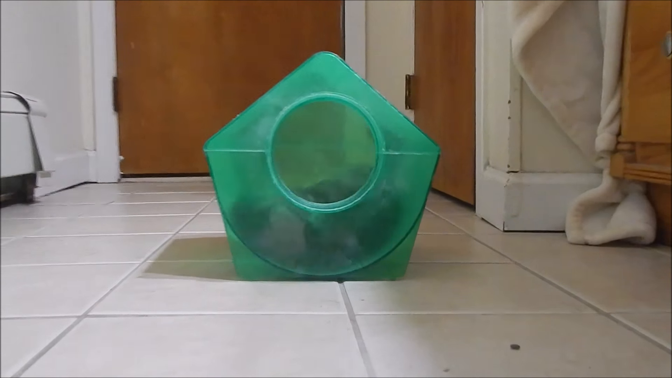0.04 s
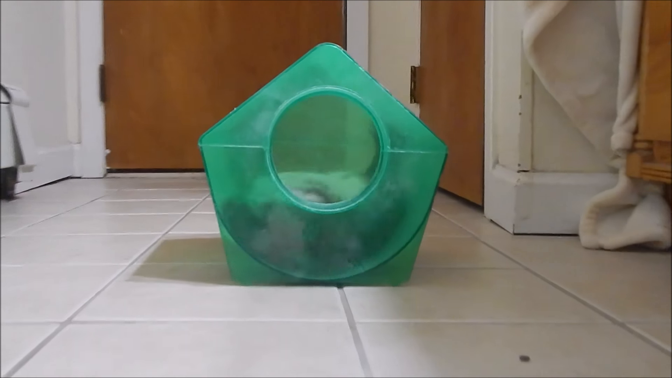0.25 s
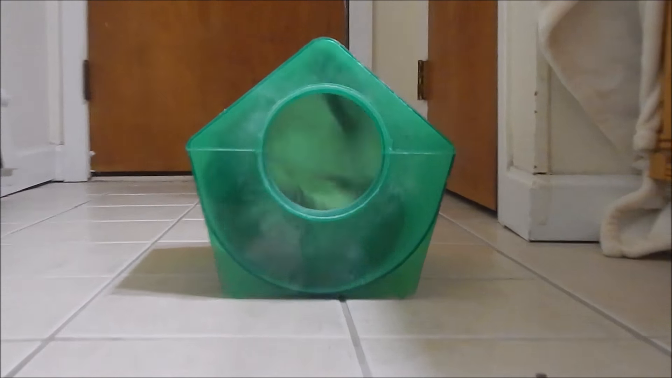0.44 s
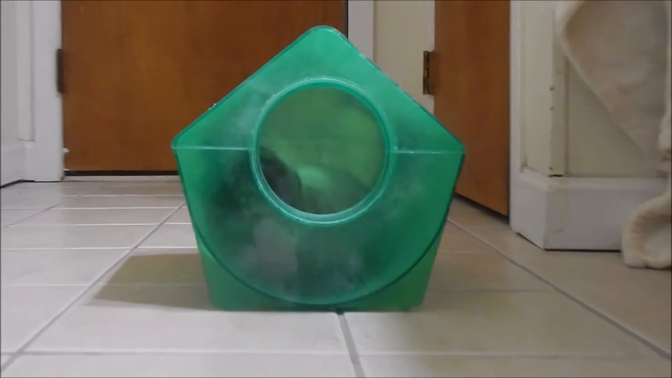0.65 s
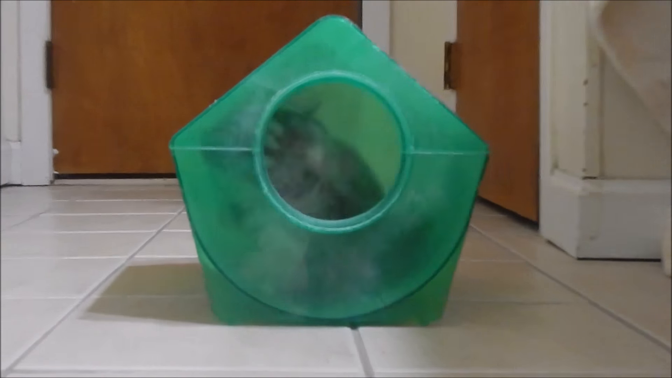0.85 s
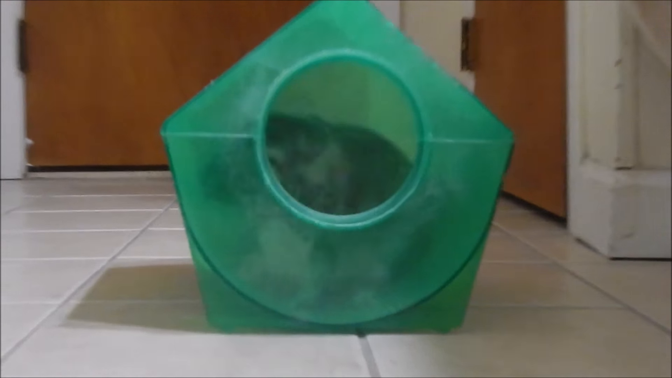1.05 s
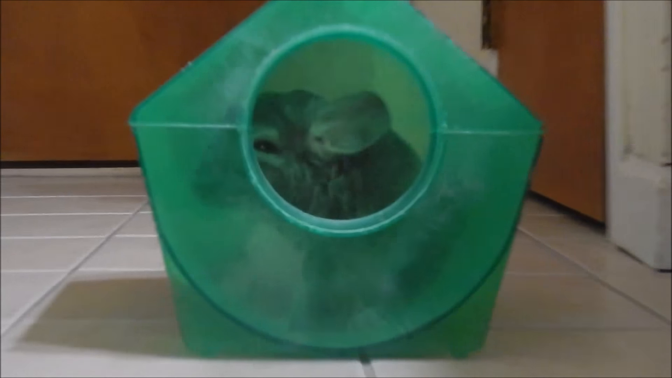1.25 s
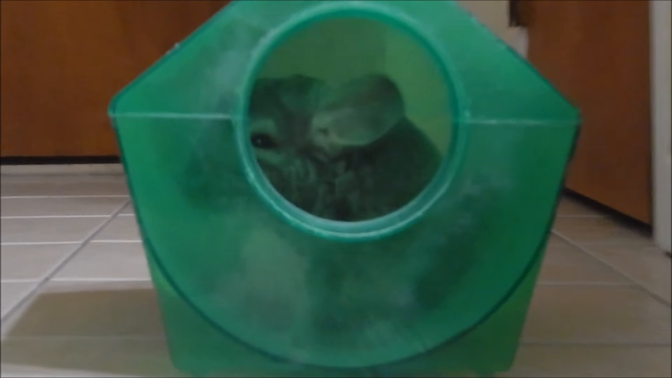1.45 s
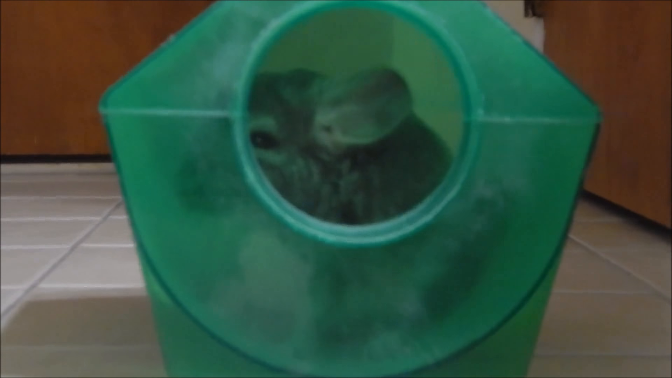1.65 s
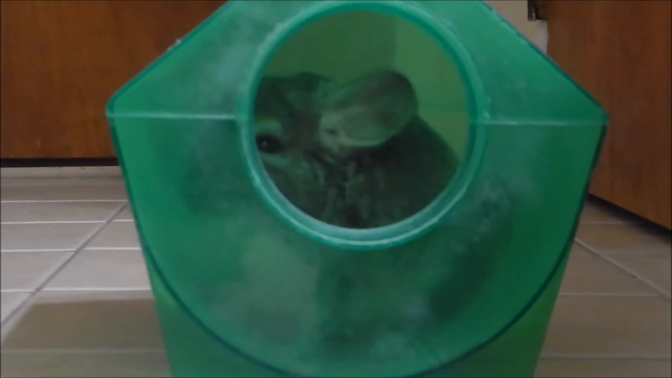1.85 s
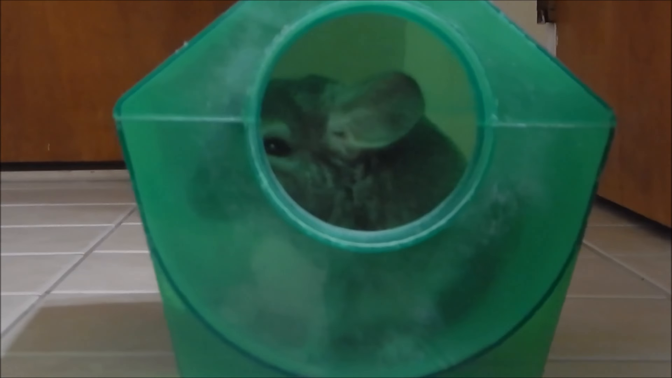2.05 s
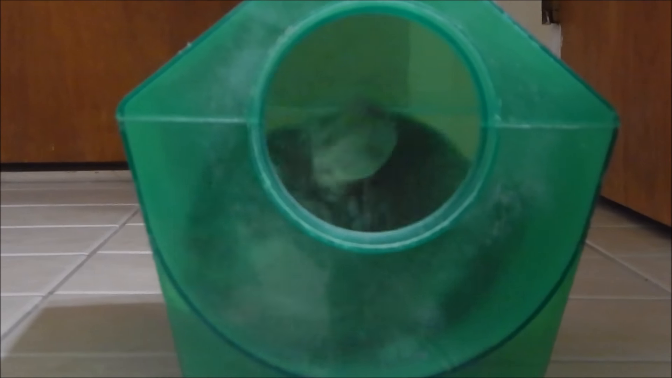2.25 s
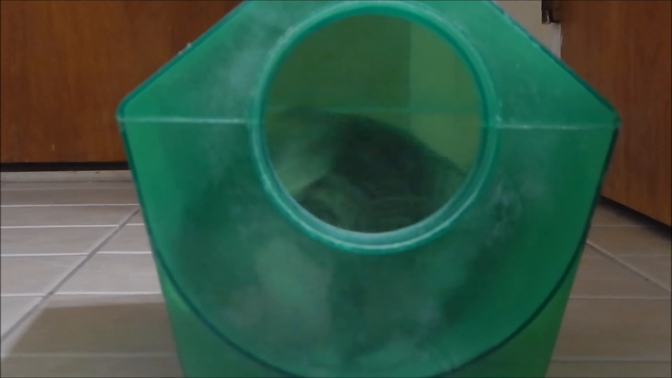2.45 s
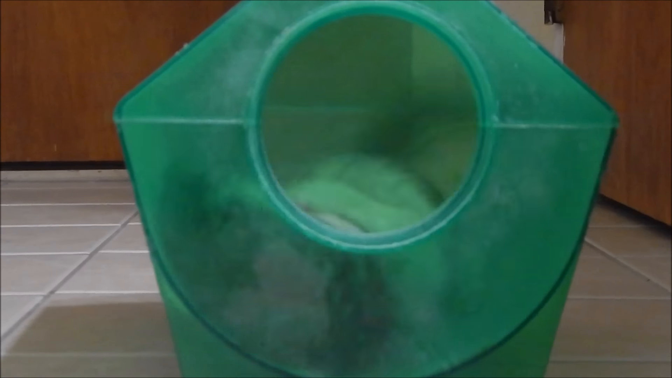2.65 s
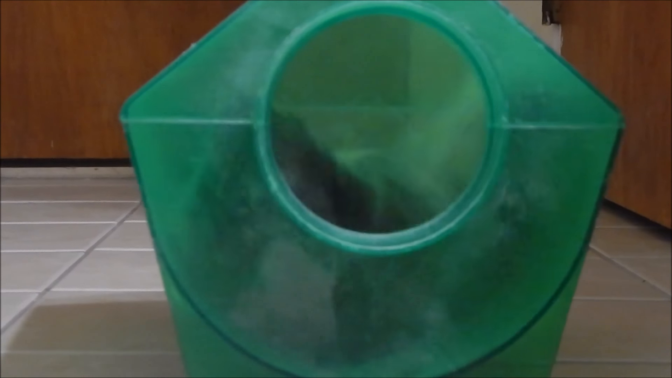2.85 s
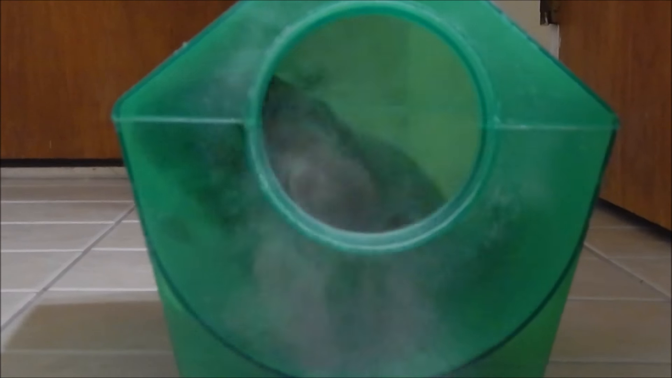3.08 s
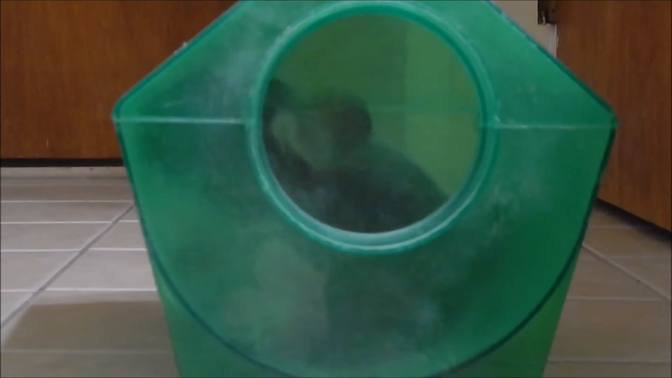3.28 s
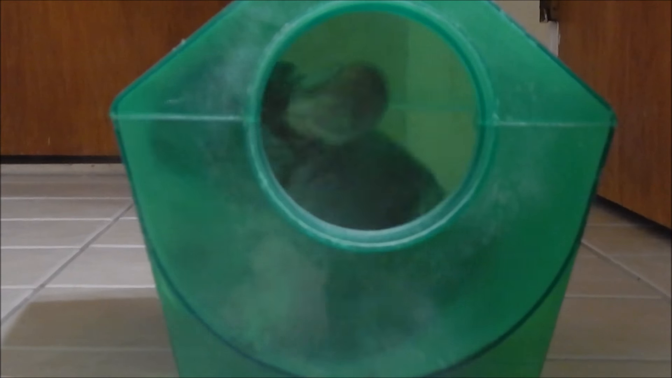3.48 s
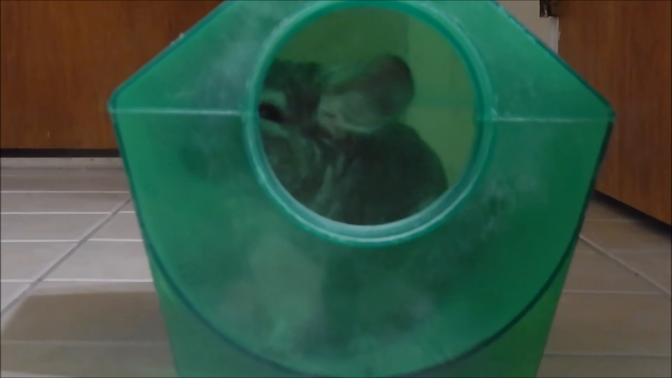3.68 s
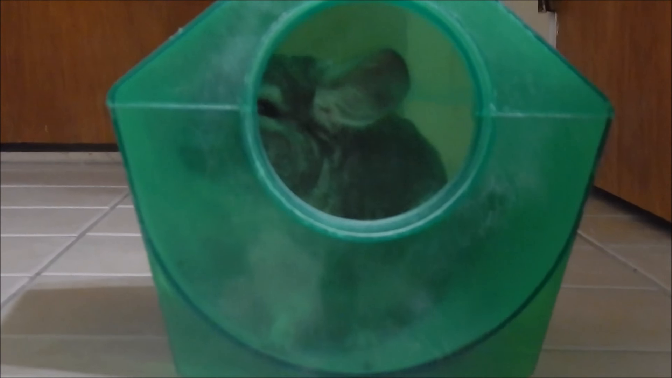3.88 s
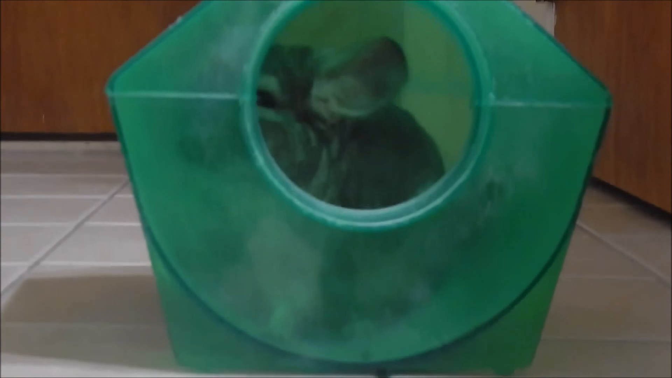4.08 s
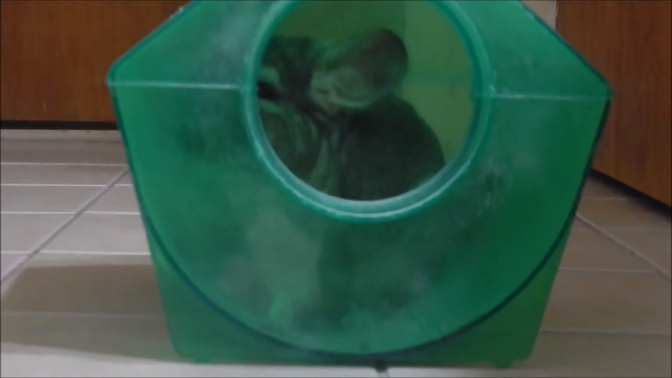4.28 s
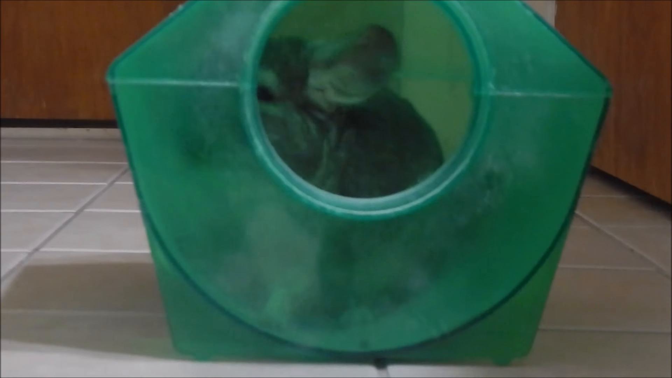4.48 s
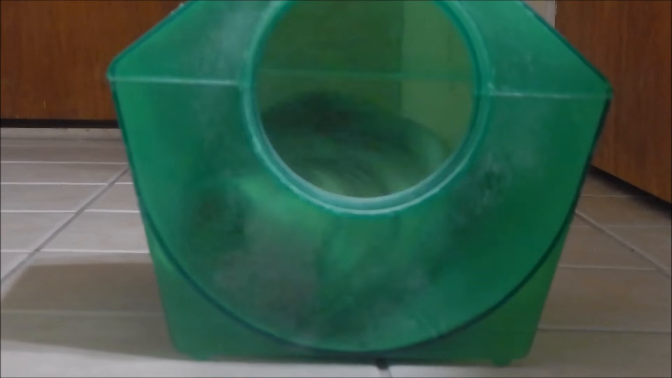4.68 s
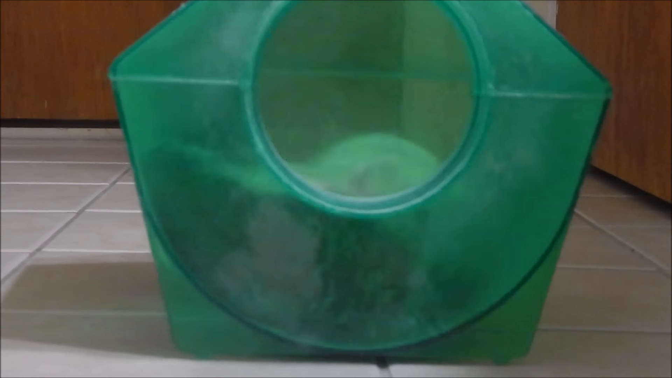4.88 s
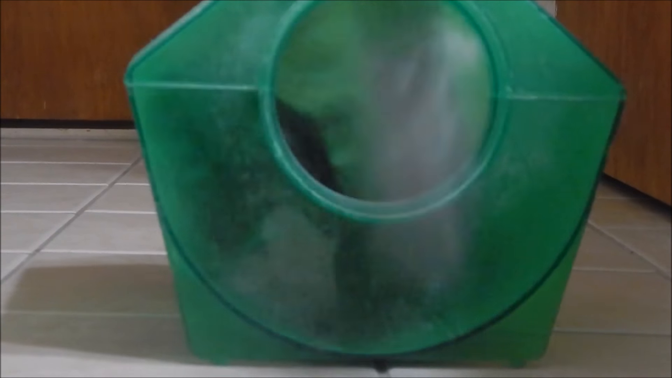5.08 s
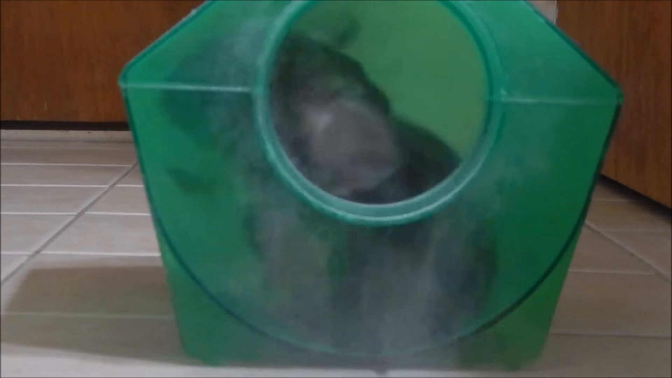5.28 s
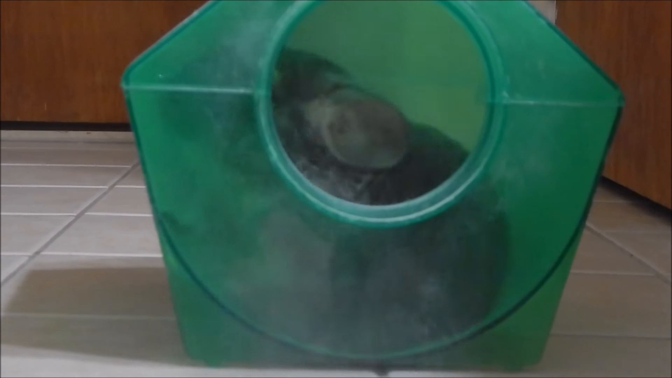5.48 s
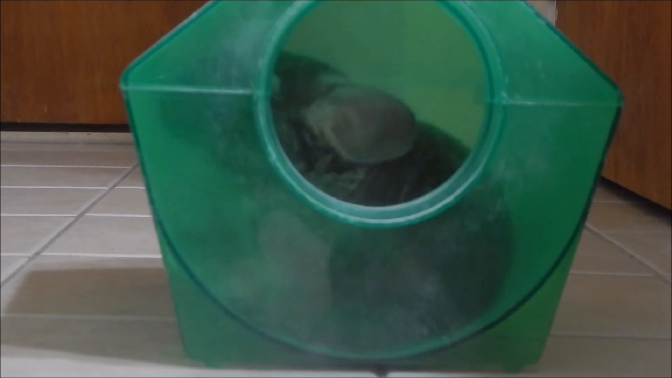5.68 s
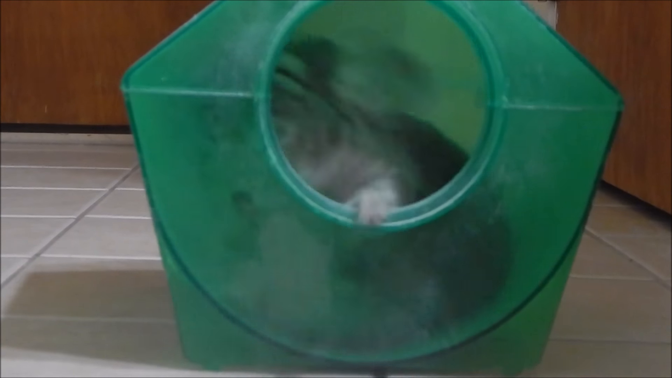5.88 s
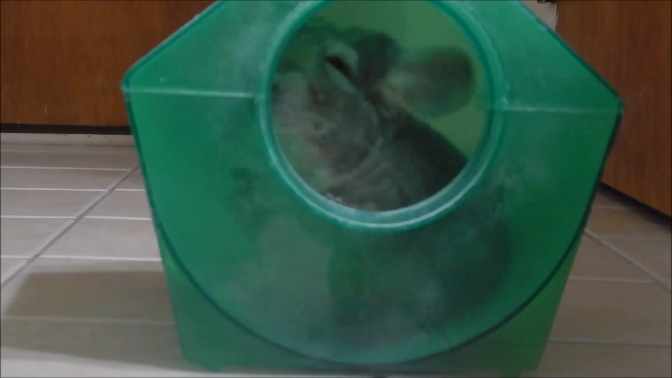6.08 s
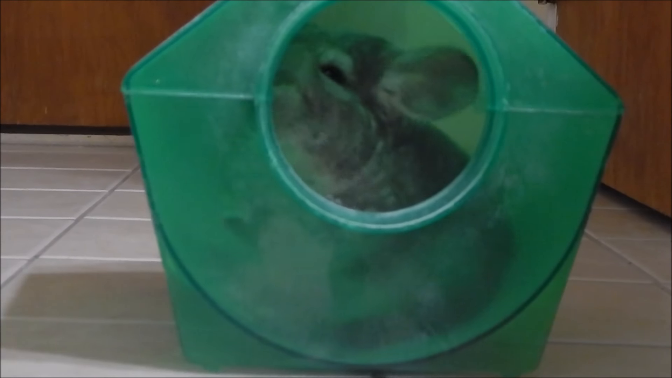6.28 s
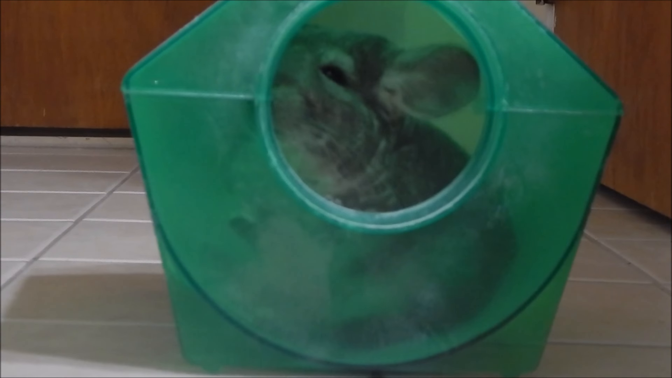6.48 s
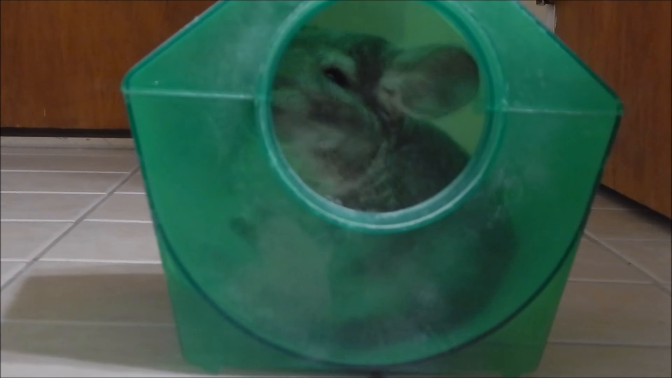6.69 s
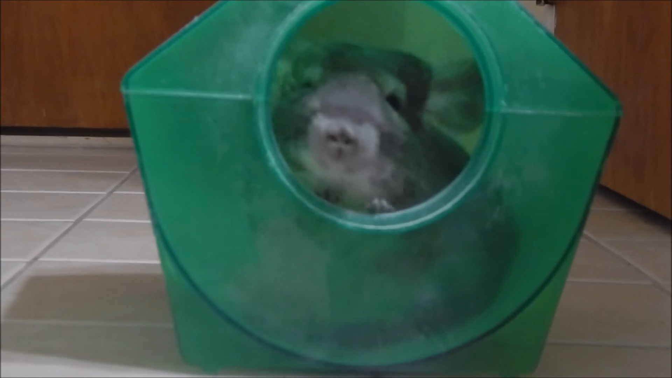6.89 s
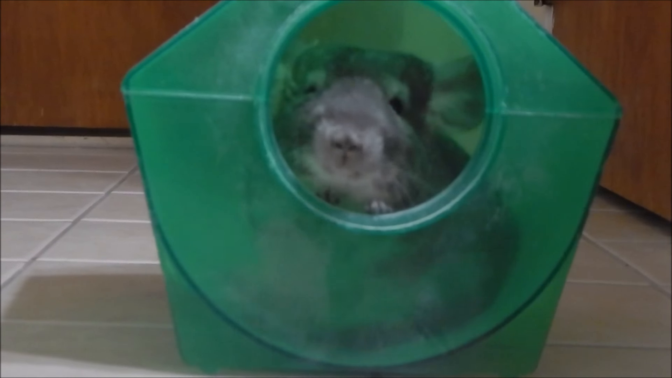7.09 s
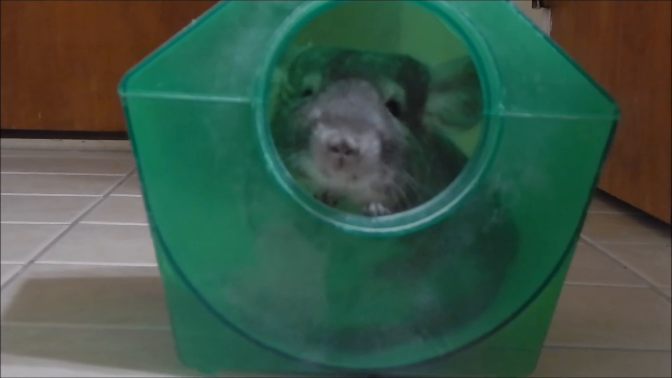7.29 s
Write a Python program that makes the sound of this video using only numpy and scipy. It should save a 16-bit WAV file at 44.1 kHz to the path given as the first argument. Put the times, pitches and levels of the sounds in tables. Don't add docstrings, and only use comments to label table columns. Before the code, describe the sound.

A small furry animal dust-bathes in a hollow plastic house, heard close up in a tiled room with short reverberation. A steady low hum around 120 Hz and faint fan air run throughout. From 0 to about 1.3 s, quick boxy thumps, claw raps, scratchy scraping and fizzing dust tumble together, over a thin high zoom-motor whine. A light click falls at 0.9 s; a hard, bright click at 1.5 s stops the whine, and the sound briefly dips. Hum dominates until 2.3 s, when scratching leads into a second, heavier flurry, 2.45 to 3.2 s. Light scuffs and a faint click follow around 3.6 s, then quiet, with a barely audible airy tone near 4.4 s. A third burst of knocks and dust spray runs 4.7 to 5.4 s. Softer scrapes, ticks and small knocks come at 5.6 to 6.5 s, and a last brief scuff near 6.9 s before hum alone.

```python
import sys
import numpy as np
from scipy import signal
from scipy.io import wavfile
from scipy.ndimage import uniform_filter1d

SR = 44100
rng = np.random.default_rng(int(sys.argv[2]) if len(sys.argv) > 2 else 0)


def dump_mix(stems):
    frames = np.atleast_2d(stems).T
    limited = np.clip(frames, -1, 1)
    pcm = np.round(limited * 32767).astype(np.int16)
    wavfile.write(sys.argv[1], SR, pcm)


def how_loud(loudness_db):
    steps = np.asarray(loudness_db, float) / 20
    return 10 ** steps


N = 323550


def evened(x):
    return x / np.sqrt(np.mean(x ** 2) + 1e-20)


def read(points, hz):
    f, value = np.transpose(points)
    return np.interp(np.log(hz + 1), np.log(f + 1), value, -150, -150)


def add(mix, start_s, sound):
    part = mix[..., round(start_s * SR):][..., :sound.shape[-1]]
    part += sound[..., :part.shape[-1]]


def ring(x, hz, t60):
    r, w = 10 ** (-3 / (t60 * SR)), 2 * np.pi * hz / SR
    return signal.lfilter([0, np.sin(w)], [1, -2 * r * np.cos(w), r * r], x)


def wander(per_s):
    drive = uniform_filter1d(rng.standard_normal(N), 64)
    return evened(signal.lfilter([1], [1, -np.exp(-2 * np.pi * per_s / SR)], drive))


# pitch_hz, left_right_likeness (0 to 1)
COHERENCE = [(60, 1), (150, 0.99), (380, 0.9), (950, 0.85), (2380, 0.19), (5980, 0.039), (15000, 0.3)]


def noise(spectrum, size, patchy_db):
    frames, hz = 4 * N // size + 5, np.fft.rfftfreq(size, 1 / SR)
    a, b, c, d, patches = rng.standard_normal((frames, len(hz), 5)).T
    patches = uniform_filter1d(patches, size // 64, 0)
    patches = evened(uniform_filter1d(patches, 8192 // size, 1))
    same = np.clip(np.interp(hz, *np.transpose(COHERENCE)), -1, 1)[:, None]
    left = a + 1j * b
    right = same * left + np.sqrt(1 - same ** 2) * (c + 1j * d)
    z = np.array([left, right])
    z *= how_loud(read(spectrum, hz)[:, None] + patchy_db * patches)
    return evened(signal.istft(z, nperseg=size, noverlap=3 * size // 4)[1][:, :N])


def swells(start_s, level_db, rise_s, fall_s):
    late = np.arange(0, N, 64)[:, None] / SR - start_s
    before = -late / np.maximum(rise_s, .004)
    after = late / np.maximum(fall_s, .004)
    shape_db = level_db - 10 * np.where(late < 0, before, after)
    return np.interp(np.arange(N), np.arange(0, N, 64), np.sqrt((how_loud(shape_db) ** 2).sum(1)))


def swelling_tones(events, rise_s, t60, trim_db=0):
    out, t = np.zeros(N), np.arange(6000) / SR
    for start_s, level_db, hz in events:
        rise = rise_s(hz) if callable(rise_s) else rise_s
        swell = np.sin(np.pi / 2 * np.minimum(t / rise, 1)) ** 2
        decay = how_loud(level_db + trim_db - 60 * np.maximum(t - rise, 0) / t60)
        add(out, start_s, swell * decay * np.sin(2 * np.pi * hz * t))
    return out


def rattles(events, t60):
    out, t = np.zeros(N), np.arange(3000) / SR
    for start_s, level_db, hz in events:
        tick = ring(rng.standard_normal(3000) * how_loud(-60 * t / t60), hz, 0.013)
        add(out, start_s - .001, how_loud(level_db - 13.5) * tick / abs(tick).max())
    return out


# pitch_hz, level_db, t60_s
SHELL = [(88.5, -25, 0.085), (152, 3, 0.42), (228.1, -1, 0.21), (274, -6, 0.25), (296, -9.5, 0.25),
         (390, -18.5, 0.16), (480, -28, 0.051), (530, -42, 0.1)]
# pitch_hz, level_db, t60_s
WALL = [(414, -2.5, 0.047), (514, 0, 0.099), (698, 1.5, 0.047), (767, 1.5, 0.022), (840, -2.5, 0.026),
        (930, -4, 0.042), (1025, -2.5, 0.06), (1320, -27.5, 0.025), (1890, -36, 0.026), (3400, -21, 0.014)]
# start_s, level_db, ease_10db_s
PUSHES = [(0.0, -12, 0.14), (0.238, -11.5, 0.08), (.42, -13, 0.26), (.72, -11.5, 0.1), (1.02, -23, -0.12),
          (1.107, -12, 0.0542), (1.29, -14.5, -0.12), (2.47, -15.5, 0.1552), (2.63, -11, 0.01),
          (2.75, -11, 0.15), (2.879, -8.5, 0.003), (2.97, -15.5, 0), (3.088, -9.5, 0.1071),
          (4.76, -12, -0.05), (4.911, -9.5, 0.216), (5.02, -16, 0.16), (5.28, -11, 0.0443),
          (5.97, -31, 0.5), (6.29, -20.5, 0.16), (6.5, -26, -0.66), (6.89, -27.5, 0.23)]
PUSH_RISE_S = 0.04


def rubbing():
    drive = rng.standard_normal(N) * how_loud(1.7 * wander(8.6))
    body = evened(sum(how_loud(db) * evened(ring(drive, hz, t60)) for hz, db, t60 in SHELL))
    wall = evened(sum(how_loud(db) * evened(ring(drive, hz, t60)) for hz, db, t60 in WALL))
    start_s, level_db, ease_s = np.transpose(PUSHES)
    return swells(start_s, level_db, PUSH_RISE_S, ease_s) * (how_loud(-7.0) * body + how_loud(-30.0) * wall)


# pitch_hz, density_db per Hz
SCRAPE = [(500, 5.5), (900, 5), (1500, 3), (2200, -1.5), (3200, -12.5), (5000, -31)]
# pitch_hz, density_db per Hz
DUST = [(1470, -21), (2200, -1.5), (3850, -2), (5100, -5.5), (5750, -4.5), (9490, -5), (13300, -12.5),
        (14400, -17.5), (15300, -40.5)]
# start_s, spray_db, claws_above_spray_db, rise_10db_s, fall_10db_s
KICKS = [(0.0, -57, 8, .05, .02), (.04, -56, 20, -1, -0.1), (.132, -59.5, 9, .015, 0.05),
         (.213, -59, 16, -0.05, 0.05), (.31, -62.5, -4, 1.2, 0.3), (0.404, -47, 12, -0.06, -0.02),
         (.432, -55, 9, 0.1, 0.05), (.51, -52, 6.5, 0.04, 0.05), (0.565, -49.5, 9.5, -0.01, 0),
         (.62, -57.5, 10, 0.2, 0.15), (.67, -50.5, 11, .015, 0.02), (.72, -54.5, 13, 0.08, 0.06),
         (.81, -53.5, 0, .06, 0.04), (.89, -53, 7.5, 0.12, 0.08), (.972, -52.5, 4, 0.07, 0.06),
         (1.018, -58, 19, 0.1, 0.18), (1.04, -55.5, 11, 0.1, 0.16), (1.45, -69.5, -5, 9, 2),
         (1.57, -57.5, 8.5, 0.1, 0.1),
         (2.299, -55.5, 12.5, .012, 0.055), (2.449, -52, 8, 0.065, 0.06),
                (2.498, -46, 10, 0.019, 0.045), (2.55, -47.5, 8.1, 0.035, 0.042),
                (2.645, -56, 17, 0.029, 0.043), (2.82, -46.5, 6, 0.14, 0.06),
                (2.998, -55.5, 17.5, 0.13, 0.014), (3.093, -52.5, 8, 0.055, 0.12),
                (3.44, -59, 11.7, 0.019, 0.19), (3.582, -56, 9, 0.011, 0.076), (3.71, -62, 4, 0.18, 0.042),
                (4.028, -71, 0, .02, 0.028),
         (4.664, -60, 12, 0.15, 0.18), (4.769, -47.5, 9.7, 0.053, 0.071),
               (4.808, -49, 12, .03, 0.039), (4.944, -50, 12, 0.11, 0.02), (5.045, -47, 2.2, 0.15, 0.046),
               (5.358, -55, 11.8, 0.47, 0.1), (5.592, -60.5, 8.1, 0.15, 0.053),
               (5.667, -56.5, 12, 0.023, 0.033), (5.8, -68, 4, 0.26, 0.32), (5.93, -56, 12, .02, 0.088),
               (6.031, -56.5, 6.5, 0.051, 0.047), (6.106, -52, 3.3, 0.023, 0.079),
               (6.181, -51, 13.8, 0.052, 0.038), (6.26, -53.5, 15.5, 0.031, 0.032),
               (6.39, -66, 14, 0.2, 0.064), (6.849, -56, 12.5, 0.01, 0.062),
               (6.914, -58, 15.7, 0.064, 0.057)]


def scrabble():
    gusts = wander(25)
    kicks = KICKS
    start_s, spray_db, claws_db, rise_s, fall_s = np.transpose(kicks)
    claws = swells(start_s, spray_db + claws_db, 0.6 * rise_s, fall_s)
    claws = claws * how_loud(-1.0 + 1.0 * gusts) * noise(SCRAPE, size=256, patchy_db=3.0)
    dust = swells(start_s, spray_db, rise_s, fall_s)
    dust = dust * how_loud(3.5 + 2.0 * gusts) * noise(DUST, size=256, patchy_db=1.5)
    return claws + dust


def hum():
    level_db = -28 + 0.84 * wander(1.6)
    return np.sqrt(2) * how_loud(level_db) * np.sin(2 * np.pi * 120.005 * np.arange(N) / SR)


# pitch_hz, density_db per Hz
AIR = [(88, -28), (150, -14), (221, 2.5), (243, -2.5), (278, -2), (378, -7.5), (409, -10.5), (661, -13),
       (701, -5.5), (772, -9.5), (900, -2), (1200, -13.5), (1750, -20), (2310, -20.5), (3090, -28.5),
       (9000, -45), (15800, -51)]


def fan_air():
    return how_loud(-43.5) * noise(AIR, size=1024, patchy_db=1.92)


# pitch_hz, density_db per Hz
RUMBLE = [(12, -78), (26, -65), (34, -72.5), (55, -68), (90, -73.5), (120, -53), (160, -71.5), (200, -96)]


def room_rumble():
    return how_loud(-38.5) * noise(RUMBLE, size=4096, patchy_db=3.5)


# pitch_hz, density_db per Hz
THUD = [(15, -21), (27, 0), (33, -21.5), (60, 2), (85, 2), (110, -24)]


def floor_thud():
    start_s, level_db, ease_s = np.transpose(PUSHES)
    pushes = swells(start_s, level_db, PUSH_RISE_S, ease_s)
    return how_loud(-30.5) * pushes * noise(THUD, size=4096, patchy_db=5)


def zoom_whine():
    pitch_hz, width_hz, level_db, end_s = 7200, 400, -66, 1.53
    t = np.arange(N) / SR
    whine = evened(ring(rng.standard_normal(N), pitch_hz, 3.2 / width_hz))
    out = how_loud([[level_db], [level_db - 11]]) * whine * (np.arange(N) < end_s * SR)
    return out * how_loud(np.interp(t, [.9, 1.15], [-5, 1]))


# start_s, blow_db, panel_hz, hardness_db,
# wall_hz
KNOCKS = [(0.038, -15, 162, -5, 462), (0.133, -10.5, 235, -16.5, 840), (0.216, -3.5, 156, -11, 530),
          (0.301, -20.5, 149, -28, 513), (0.396, -10, 152, -12.5, 820), (0.449, -8, 152, -24, 795),
          (0.494, -6.5, 151, -27, 477), (0.559, -8.5, 226, -14, 840), (0.61, -6.5, 133, -27, 674),
          (0.663, -6.5, 244, -15.5, 812), (0.722, -6.5, 157, -10, 537), (0.769, -16, 145, -24, 700),
          (0.877, -8, 139, -27.5, 520), (1.017, -12, 296, -17, 514), (1.057, -7.5, 177, -17.5, 470),
          (1.095, -5, 150, -17, 530), (1.233, -15, 144, -26, 490), (1.281, -14, 149, -19.5, 480),
          (2.458, -2, 221, -24, 850), (2.49, -10, 227, -29, 690), (2.545, -8, 148, -18, 460),
                 (2.601, -3.5, 147, -25, 550), (2.638, -8, 145, -31, 473), (2.735, -4, 242, -20, 970),
                 (2.765, -9, 138, -14, 765), (2.803, -9, 131, -14, 470), (2.849, -7, 160, -16.5, 830),
                 (2.871, -17, 161, -5, 976), (2.968, 0.5, 258, -39, 505), (2.994, -2, 244, -25, 900),
                 (3.078, -9, 237, -12, 580), (3.147, -15, 288, -23, 530),
          (4.744, -7, 150, -31, 545), (4.805, -8, 237, -24, 586), (4.847, -12.5, 233.5, -22, 824),
                (4.895, -10, 234, -19, 520), (4.947, -1, 245, -12.5, 527), (4.991, -5.5, 152, -15.5, 440),
                (5.021, -7, 145, -37, 546), (5.055, -4.5, 152, -22, 517), (5.191, -11.5, 288, -23, 514),
                (5.219, -13.5, 283, -24, 810), (5.258, -4.5, 142, -26, 510), (5.32, -9, 150, -19.5, 505),
                (6.275, -18, 149, -24.5, 590), (6.362, -12.5, 152, -35, 940), (6.484, -13, 143.5, -27, 954)]
FAINT_KNOCKS = [(1.947, -36, 275, -9, 1020), (2.31, -47, 234, 9, 910), (3.576, -26.5, 236.6, -23.5, 1020),
                (3.756, -25, 205, -15, 890), (3.855, -24, 220, -22, 390), (4.667, -16.5, 197, -20, 970),
                (5.953, -21.5, 254, -20, 530), (6.101, -27.5, 201, -9, 524), (6.181, -20.5, 250, -23, 416),
                (6.246, -25.5, 276, -22, 970), (6.786, -19.5, 179, -29, 390), (6.9, -40, 220, -9, 390)]


def knocks():
    out, t = np.zeros(N), np.arange(900) / SR
    for start_s, blow_db, panel_hz, hard_db, wall_hz in KNOCKS + FAINT_KNOCKS:
        panel_t60 = 0.13 * how_loud(-0.69 * max(blow_db + 15, 0))
        soft, hard = np.zeros((2, 9000))
        soft[:900] = np.sin(2 * np.pi * panel_hz * t) * t * np.exp(-t * panel_hz / 0.56)
        hard[:900] = rng.standard_normal(900) * (np.exp(-t / 0.015) + np.exp(-t / 0.0025))
        hard[:4] += 3.5
        hard = signal.lfilter(*signal.butter(2, 1500., fs=SR), hard)
        low = ring(soft, panel_hz, np.clip(panel_t60, .02, .3))
        for hz, db, t60 in SHELL:
            low += how_loud(db - 4.2 * abs(np.log2(hz / panel_hz)) - 5.0) * ring(soft, hz, t60 / 2)
        high = ring(hard, wall_hz, 0.04)
        high += ring(hard, 394.7, 0.068)
        for hz, db, t60 in WALL:
            high += how_loud(db - 8.6 * abs(np.log2(hz / wall_hz)) - 8.0) * ring(hard, hz, t60)
        low *= 0.43 / abs(low).max()
        high *= how_loud(hard_db + 3.0) / abs(high).max()
        add(out, start_s - .002, how_loud(blow_db) * (low + high))
    return out


# start_s, level_db, pitch_hz
TICKS = [(0.131, -22.5, 1190), (0.2126, -16.5, 1140), (0.4, -40, 1230), (1.0156, -23.5, 1480),
         (2.991, -26, 1210), (3.4358, -27, 1970), (4.733, -39, 1230), (4.8966, -41, 1240), (5.97, -34, 780),
         (6.1, -28.5, 1810), (6.1787, -25, 1790), (6.2434, -30, 1190), (6.845, -38, 1200)]


def claw_ticks():
    return rattles(TICKS, t60=0.18)


# start_s, level_db, pitch_hz
SNAPS = [(.132, -27, 1090), (.214, -21, 1130), (0.394, -34, 1200), (.559, -44, 900), (.662, -33, 1190),
         (0.718, -35, 1180), (1.0165, -24.5, 1490), (1.096, -29, 900), (2.456, -26, 1490),
         (2.544, -29, 1500), (2.601, -38, 1000), (2.735, -26, 1190), (2.848, -31, 1100), (2.961, -25, 1090),
         (2.9914, -22, 1150), (2.998, -29, 1500), (3.078, -32, 1190), (4.738, -25, 1000),
         (4.804, -29, 2000), (4.8945, -19, 600), (4.895, -30, 1550), (4.946, -28, 1400), (4.99, -26, 1290),
         (5.29, -34, 1200), (6.179, -38, 2000), (6.245, -27, 900), (6.253, -34, 1600), (6.914, -38, 1800),
         (2.75, -30, 1090), (2.797, -27, 900), (4.922, -26, 900), (4.937, -23, 850), (5.044, -24, 850),
         (5.09, -26, 950)]


def snaps():
    return swelling_tones(SNAPS, rise_s=0.00027, t60=0.0045)


# start_s, level_db, panel_hz
BUMPS = [(.155, -22, 152), (0.235, -6, 151), (.411, -5, 148), (.496, -12, 230), (0.564, -9, 149),
         (.607, -11.5, 230), (0.708, -9, 153), (.772, -17, 236), (.922, -16.5, 149), (1.052, -14, 296),
         (1.231, -17.5, 243), (1.283, -19.5, 284), (1.305, -13.5, 253), (2.628, -4, 151), (2.781, -6, 150),
         (2.795, -5.5, 238), (3.086, -5.5, 253), (3.115, -6, 282), (3.132, -18, 270), (3.2, -24, 274),
         (4.737, -13, 242), (4.868, -26, 149), (4.908, -14, 237), (4.959, -13, 230), (4.971, -11, 290),
         (5.02, -9, 247), (5.259, -20, 234), (4.984, -5, 234), (5.32, -23, 150), (0.682, -5, 149),
         (2.65, -12, 149), (2.9601, -7, 260)]


def bumps():
    return swelling_tones(BUMPS, rise_s=lambda hz: 1.3 / hz, t60=0.075, trim_db=-7)


# start_s, level_db, pitch_hz
RAPS = [(.396, -21, 771), (.398, -25, 916), (.42, -26, 820), (0.451, -34, 860), (.564, -27.5, 900),
        (.566, -27, 770), (.663, -26, 793), (0.665, -23, 924), (.688, -28, 780), (.718, -21, 807),
        (.745, -28, 957), (2.457, -34.5, 1150), (2.465, -22, 417), (2.495, -32, 690), (2.734, -31.5, 1146),
        (2.74, -18.5, 400), (2.747, -43, 970), (2.764, -18.5, 745), (2.848, -35, 1070), (2.852, -23.5, 458),
        (2.994, -30, 1050), (2.995, -19, 397), (3.077, -31, 1230), (3.09, -17, 390), (3.091, -26, 980),
        (3.752, -34.5, 877), (4.893, -20, 378), (4.894, -27, 562), (2.964, -25.5, 515), (2.996, -28, 590),
        (4.91, -23, 800), (4.911, -25.5, 923), (4.948, -29, 1110), (5.054, -18.5, 390), (5.194, -26, 404),
        (5.22, -27.5, 840), (5.947, -32, 490), (5.948, -35, 785), (5.951, -36.5, 1090), (5.972, -33, 770),
        (5.948, -49, 3400)]


def raps():
    return swelling_tones(RAPS, rise_s=0.002, t60=0.057)


# start_s, case_db, crack_db, rise_s, crack_ring_s
LEVER = [
    (0.8746, -1, -33, .0005, 0.016),
    (1.5282, -1, -19.5, 0.0017, .012),
    (3.5695, -24, -37.5, .0005, 0.035),
]
# pitch_hz, left_db, right_db, t60_s, left_late_s
CASE = [(1000, -30, -21, 0.023, 0.0033), (1290, -20, -29, .012, 0.0018), (1860, -13.5, -24, .04, .0035),
        (2234, -30, -15, .014, .003), (2640, -26, -19.5, 0.022, 0.0076), (3360, -15.5, -19, .025, 0.0016),
        (4110, -24, -14, 0.012, 0), (4850, -20, -21, .03, 0), (5760, -30, -25, 0.01, 0.0042),
        (6650, -30, -23.5, .015, 0.0037), (8440, -27, -25, .015, 0.0015), (9260, -33, -27, .012, 0.004),
        (9870, -33, -26, 0.027, 0), (12540, -30, -25, 0.0092, 0.0039)]
# pitch_hz, left_db, right_db, t60_s, left_late_s
LATCH = [(2500, -32, -36, 0.014, 0), (3230, -29, -22.5, 0.0093, 0.002), (4230, -35, -34, 0.013, 0.006),
         (5440, -28, -28, 0.0065, 0), (7000, -35, -42, 0.017, .001)]


def lever_clicks():
    out, t = np.zeros((2, N)), np.arange(3000) / SR
    crack_band = signal.butter(2, [1500., 12500.], "band", fs=SR, output="sos")

    def struck(u, rise_s, t60):
        swell = np.sin(np.pi / 2 * np.clip(u / rise_s, 0, 1)) ** 2
        return swell * how_loud(-60 * np.maximum(u - rise_s, 0) / t60)

    for (start_s, case_db, crack_db, rise_s, crack_s), modes in zip(LEVER, [LATCH, CASE, LATCH]):
        crack = rng.standard_normal((2, 3000)) * how_loud(crack_db) * struck(t, rise_s, crack_s)
        click = signal.sosfilt(crack_band, crack)
        for hz, left_db, right_db, t60, left_late_s in modes:
            u = t - np.array([[left_late_s], [0]])
            level = how_loud(case_db + np.array([[left_db], [right_db]]))
            click += level * struck(u, rise_s, t60) * np.sin(2 * np.pi * hz * u)
        add(out, start_s, click)
    return out


# start_s, level_db, pitch_hz
GRIT = [
    (2.298, -42, 3040),
    (5.95, -40, 3400),
    (6.098, -37, 3850),
]


def grit_flicks():
    return rattles(GRIT, t60=0.071)


# start_s, level_db
GRAINS = [
    (2.998, -29.5),
    (4.804, -37),
    (5.134, -37),
    (5.349, -41),
    (5.359, -40),
    (5.396, -48),
]


def grains():
    out, t = np.zeros(N), np.arange(3000) / SR
    for start_s, level_db in GRAINS:
        phase = 2 * np.pi * 3900.0 * t * np.exp(-t / 0.0029)
        add(out, start_s, how_loud(level_db - 60 * t / 0.0063) * np.sin(phase))
    return out


# start_s, level_db, pitch_hz
MOANS = [
    (4.385, -35.5, 879),
    (4.435, -42, 876),
    (4.53, -41, 850),
]


def moans():
    return swelling_tones(MOANS, rise_s=0.022, t60=0.11)


def room(x):
    taps = np.zeros((2, SR // 2))
    at = np.arange(200, SR // 2 - 20, 20) + rng.integers(0, 20, (2, (SR // 2 - 201) // 20))
    np.put_along_axis(taps, at, rng.choice([-1., 1.], at.shape), 1)
    hz, t, z = signal.stft(taps, SR, nperseg=256)
    t60 = np.interp(hz, [200, 3000], [.4, .25])[:, None]
    tail = signal.istft(z * how_loud(-60 * t / t60), SR, nperseg=256)[1]
    likeness = 0.86
    tail[1] = likeness * tail[0] + np.sqrt(1 - likeness ** 2) * tail[1]
    return signal.fftconvolve(x[None], tail / np.linalg.norm(tail[0]), axes=1)[:, :N]


def scene():
    shell = rubbing() + knocks() + claw_ticks() + snaps() + bumps() + raps()
    shell += grit_flicks() + grains() + moans()
    shell = signal.sosfilt(signal.butter(3, 90., "high", fs=SR, output="sos"), shell)
    near = shell + how_loud(-12.0) * room(shell) + scrabble()
    near += hum() + fan_air() + room_rumble() + floor_thud()
    case = zoom_whine() + lever_clicks()
    case_echo = how_loud(-17) * room(uniform_filter1d(case[1], size=5))
    return near * how_loud([[.35], [-.35]]) + case + case_echo


def low_pass(x):
    return signal.sosfilt(signal.butter(12, 16820, fs=SR, output="sos"), x)


# time_s, gain_db
GAIN = [
    (0, -1),
    (.3, 1.5),
    (1.531, 2),
    (1.537, -11.5),
    (1.85, -7.5),
    (2.1, -2.5),
    (2.45, 2),
    (7.4, 2.03),
]
NOTCHES = [2500, 5000, 7500, 10000]
# start_s, jump_db
DROPS = [(0.193, -39), (0.2583, -30.5), (0.6942, -34), (0.76, -33), (1.328, -34), (1.3955, -33),
         (1.8267, -43.5), (1.8936, -50.5), (1.9624, -39), (2.394, -37), (2.461, -23.5), (2.5257, -51),
         (2.9638, -29.5), (3.028, -33.5), (3.595, -42), (4.1638, -49), (4.597, -47), (4.662, -45.5),
         (4.73, -54), (5.1645, -35), (5.231, -32.5), (5.297, -33), (5.7317, -36.5), (5.8, -34.5),
         (5.865, -34), (6.3002, -37.5), (6.366, -34.5), (6.866, -39), (6.9354, -49)]


def record(dry):
    x = dry * how_loud(np.interp(np.arange(N) / SR, *np.transpose(GAIN)))
    x = .9 * np.tanh(x / .9)
    for hz in NOTCHES:
        x = signal.lfilter(*signal.iirnotch(hz, hz / 60., SR), x)
    for start_s, jump_db in DROPS:
        at = round(start_s * SR) + 30
        x[:, at] -= np.sign(x[0, at]) * how_loud(jump_db + 12.5)
    x = signal.oaconvolve(x, signal.firwin(101, 16500, fs=SR)[None], "same")
    return low_pass(x)


dry = scene()
out = record(dry)
dump_mix(out)
```